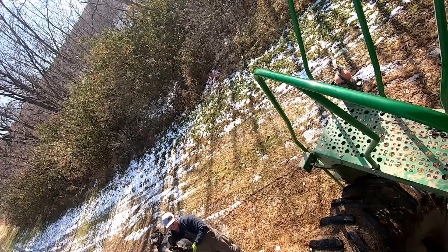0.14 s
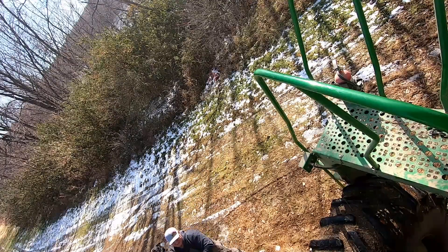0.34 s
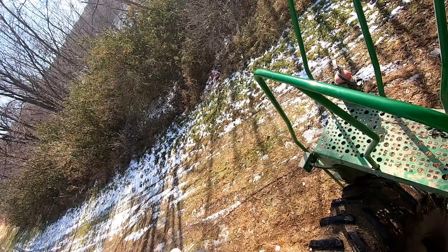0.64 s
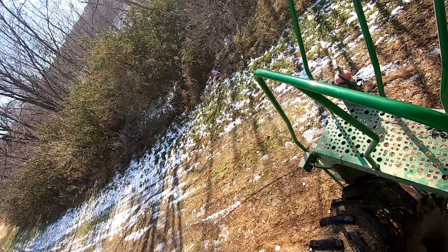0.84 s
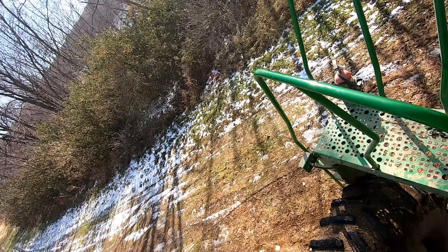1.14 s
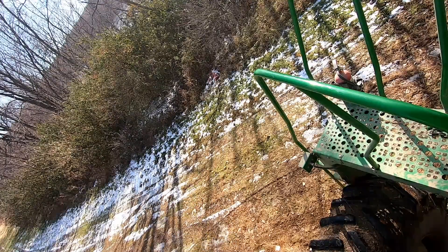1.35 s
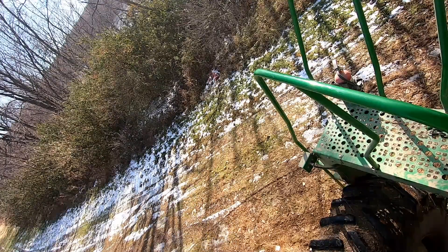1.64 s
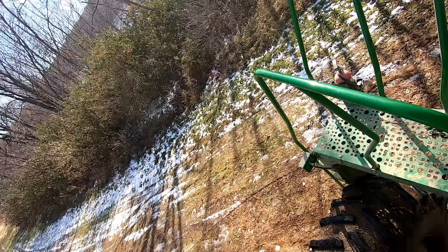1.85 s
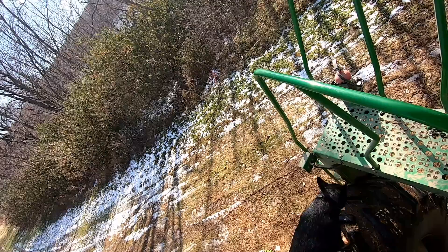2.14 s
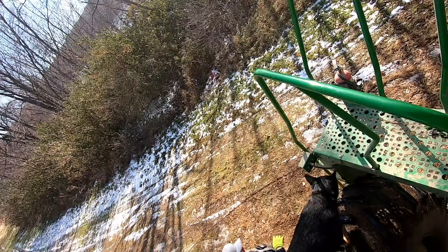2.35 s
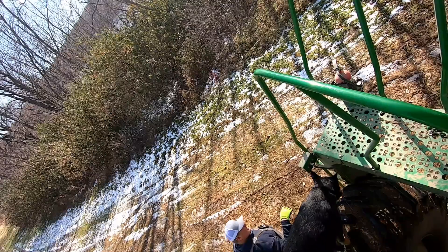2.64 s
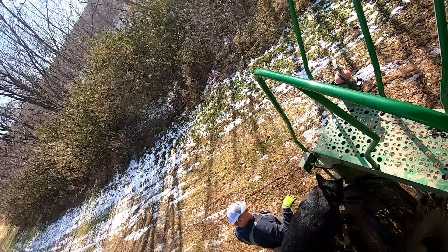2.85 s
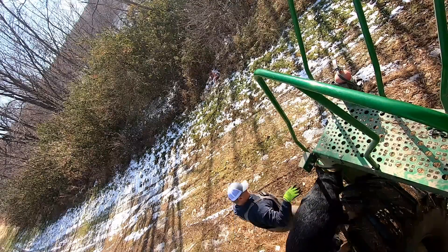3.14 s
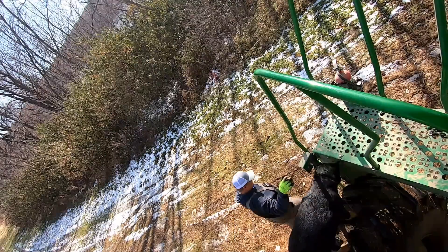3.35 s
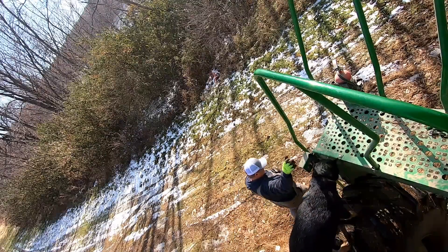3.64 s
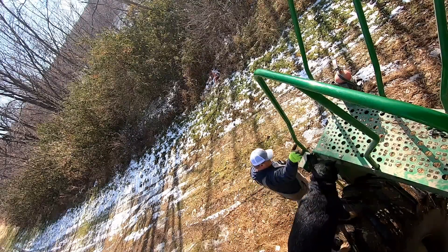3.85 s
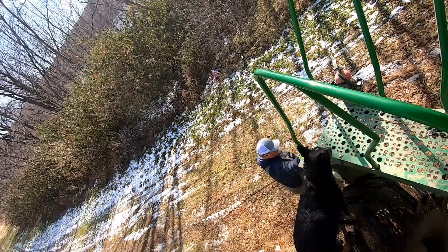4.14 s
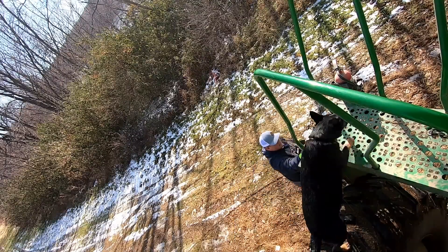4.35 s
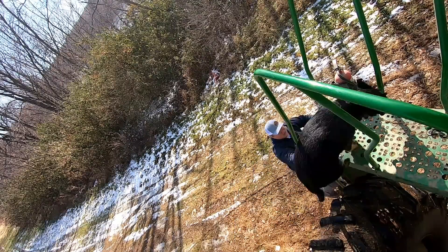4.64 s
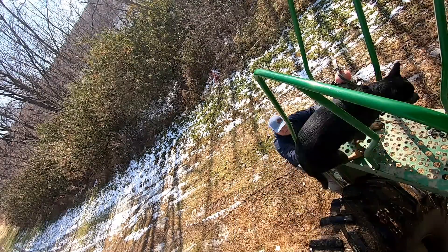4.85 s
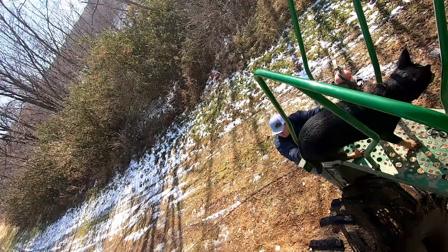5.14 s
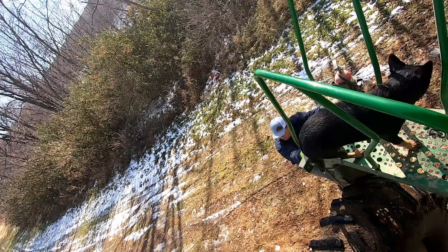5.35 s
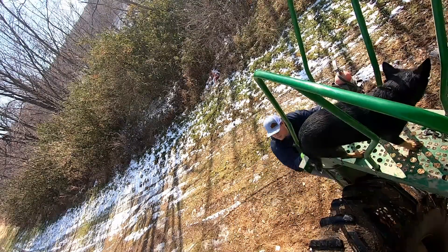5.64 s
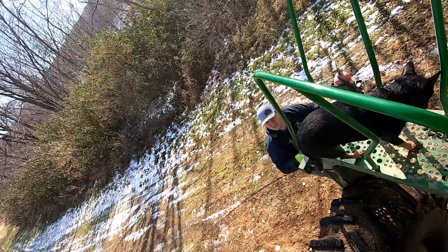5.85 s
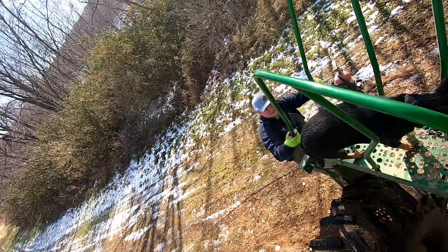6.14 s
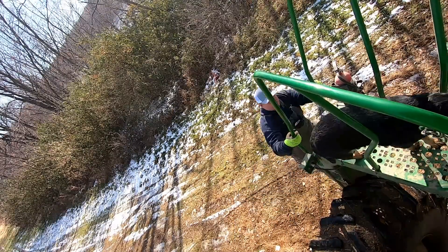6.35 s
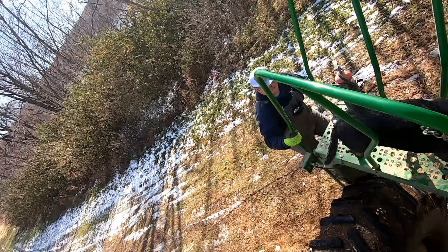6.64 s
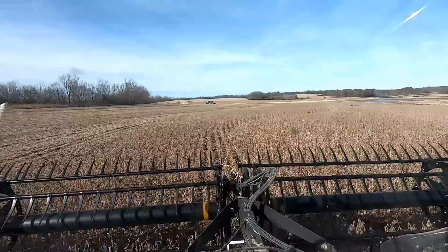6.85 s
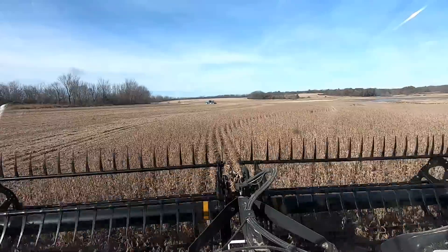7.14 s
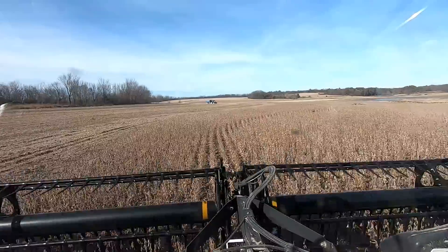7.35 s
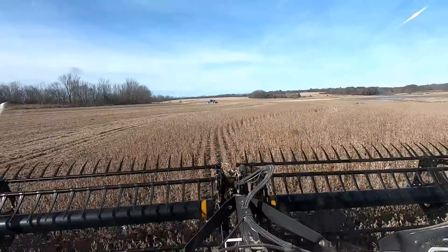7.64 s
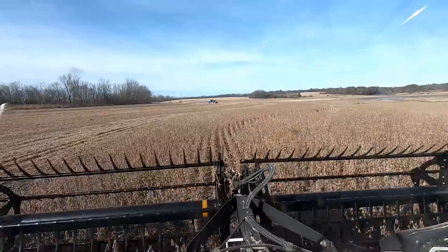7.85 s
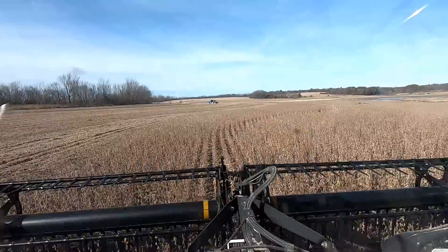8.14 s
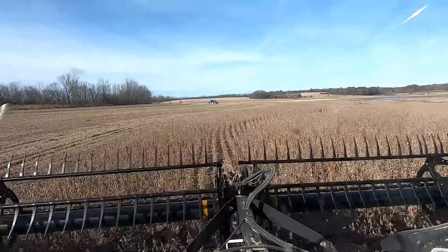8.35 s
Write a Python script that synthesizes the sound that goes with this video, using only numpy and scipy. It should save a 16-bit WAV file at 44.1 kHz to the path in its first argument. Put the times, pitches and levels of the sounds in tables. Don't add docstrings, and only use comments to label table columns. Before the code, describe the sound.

A big diesel idles with steady throb and clatter while claws tick on steel steps, then an abrupt cut to a roaring, thumping harvester cutting dry crop.

```python
import sys
import numpy as np
from scipy import signal
from scipy.fft import rfft, irfft, next_fast_len
from scipy.io import wavfile
from scipy.ndimage import uniform_filter1d

SR = 44100
rng = np.random.default_rng(int(sys.argv[2]) if len(sys.argv) > 2 else 0)


def materialize(psi):
    bounded = np.clip(np.atleast_2d(psi).T, -1, 1)
    quanta = np.round(bounded * 32767).astype(np.int16)
    wavfile.write(sys.argv[1], SR, quanta)


def gain_from_db(level_db):
    decades = np.asarray(level_db, float) / 20
    return 10 ** decades


N = 375291
TIME = np.arange(N) / SR
CHANGE_S = 6.8975

# (multiple of the two-turn engine cycle [1]), and its (level [dB])
IDLE_ORDERS = [3, 5, 6, 7, 12, 13, 30, 45, 144, 200, 246, 340]
IDLE_ORDER_DB = [-46, -52, -43.5, -52, -44, -53, -63, -63, -71, -71, -70, -80]
# (frequency [Hz]), and its (level [dB])
IDLE_TONES_HZ = [17.4, 46.4, 106.3, 151.4, 181.6, 354.6, 384.2, 531.6, 539.7, 1536.3]
IDLE_TONE_DB = [-60, -57, -44, -55, -59, -56, -57, -64, -64, -73]
# (frequency [Hz], level per Hz [dB])
EXHAUST_SPECTRUM = [(2, -20), (8, -27), (40, -19), (47, -5), (75, -4.5), (95, 1.5), (125, -8.5), (225, -10),
                    (245, -14.5), (420, -15.5), (480, -18.5), (720, -22.5), (1000, -26), (1500, -37)]
# (frequency [Hz], level per Hz [dB])
FAN_SPECTRUM = [(650, -34), (1100, -1.5), (1730, -7.5), (2450, -10.5), (3020, -13.5), (4120, -14.5),
                (4980, -16), (5150, -13.5), (5380, -18), (5690, -18.5), (7030, -17.5), (15600, -36.5)]
# (centre [Hz], width [Hz], boost [dB])
ENGINE_BAY = [(243, 22, -5), (275, 30, 2), (420, 20, 2), (438, 16, -4), (495, 40, -2), (580, 70, 3),
              (665, 55, 6.5), (712, 50, -3.5), (960, 200, 2), (1700, 200, -2.5), (2000, 120, 3),
              (3390, 90, 4), (5285, 170, 5)]
# (frequency [Hz], level per Hz [dB])
CLATTER_SPECTRUM = [(400, -30), (800, -6), (1300, -4), (2000, -5), (2700, -9), (3200, -20), (5000, -34)]
TURBO_FLUTTER_DB = 2, 3

# (time [s], peak level [dB], centre [Hz], scrape length [ms], ring [0-1])
TICKS = [(.003, -54, 8500, 8, 0), (.533, -59, 9500, 12, 0), (4.453, -51, 5500, 10, 0),
         (4.474, -53, 7500, 14, 0), (4.919, -50, 7500, 12, 0), (4.994, -43, 3900, 11, .3),
         (4.998, -48, 8500, 11, 0), (5.664, -45, 7200, 3, 0), (6.397, -49, 6000, 6, .2),
         (6.449, -41, 7600, 9, 1), (6.4915, -29, 10000, .1, 0), (6.493, -35, 5600, 9, .9),
         (6.493, -40, 10500, 11, 0), (6.508, -47, 6500, 6, .3), (6.526, -49, 8500, 14, 1),
         (6.544, -43, 6000, 7, .8), (6.547, -46, 11000, 6, .3), (7.255, -46, 8500, 6, 0)]
# (frequency [Hz], level [dB], time to fall 60 dB [s])
TAG_MODES = [(6050, 0, .03), (6550, -2, .04), (9000, -7, .03), (11300, -4, .04)]
SQUEAK_DB = [0, -8, -3, 2, -15, -22]
# (time [s], spread [s], level [dB])
BRUSHES = [
    (4.46, .06, -73),
    (5.0, .1, -69),
    (5.4, .4, -71),
    (6.51, .06, -67),
]
# (frequency [Hz], level per Hz [dB])
BRUSH_SPECTRUM = [(3000, -20), (6000, -3), (9000, 0), (13000, -6), (16000, -14)]

# (time [s], spread [s], shaft thump [dB], firing swell [dB], bar swell [dB])
STROKES = [
    (6.93, .075, -23, -29, -30),
    (7.31, .075, -25, -23, -33),
    (7.615, .11, -21, -36, -31),
    (7.93, .085, -27, -27, -33),
    (8.285, .085, -22, -26, -40),
]
# (frequency [Hz]), (resting level [dB]), (change in a pressure surge [dB])
BARS_HZ = [197, 377, 429]
BAR_REST_DB = [-44, -43, -38]
BAR_SURGE_DB = [.1, 4, -9]
# (time [s], share of nominal [1])
GROUND_SPEED = [(6.9, .996), (7.15, .996), (7.45, 1.004), (7.85, .997), (8.1, .975), (8.3, .964),
                (8.51, .96)]
# (time [s], spread [s], strength [1])
SURGES = [
    (7.29, .06, 1.),
    (7.9, .13, 1.05),
]
# (level [dB]), (change per percent of speed [dB]), (change in a surge [dB])
PUMP_LEVEL_DB = [-42, -45.5, -60, -52]
PUMP_DB_PER_PERCENT = [-1.5, 3.5, .6, .1]
PUMP_SURGE_DB = [2.5, 4.2, 17.8, .1]
PUMP_SIDE_DB = [-4, -11]
# (frequency [Hz]), and its (level [dB])
GEAR_TONES_HZ = [24.5, 41.7, 225.5, 303, 499.3, 532, 721, 997, 2495]
GEAR_TONE_DB = [-35, -34, -44.5, -46, -41, -46.5, -53, -56, -55]
# (frequency [Hz], level per Hz [dB])
ROAR_SPECTRUM = [(8.8, -35), (15, -3.5), (53, -1.5), (80, -3.5), (114, -8), (141, -5.5), (342, -16.5),
                 (477, -13), (578, -23), (977, -23.5), (1610, -26), (2150, -30), (4500, -45.5), (5850, -80),
                 (9900, -120)]
# (centre [Hz], width [Hz], boost [dB])
DRUM_HOUSING = [(5, 15, 10), (426, 110, 3), (684, 220, 7), (2230, 1140, 8), (3360, 71, 8), (1660, 210, -6),
                (2570, 220, -3), (2400, 150, 2)]
# (frequency [Hz], level per Hz [dB])
STALK_SPECTRUM = [(2060, -22), (3500, -2.5), (4670, -3), (6110, -2), (7420, -3.5), (11900, -13),
                  (14100, -19), (15600, -24)]
# (centre [Hz], width [Hz], boost [dB])
STALK_BODY = [(5990, 100, 5), (7300, 300, 2), (11500, 150, 3)]


def noise():
    return rng.standard_normal(N)


def level(x, db):
    return x * gain_from_db(db) / np.sqrt(np.mean(x ** 2))


def ramp(start, end):
    return np.clip((TIME - start) / (end - start), 0, 1)


def swells(times, peaks, spreads, order=2):
    bells = np.broadcast(times, peaks, spreads)
    return sum(p * np.exp(-.5 * abs((TIME - s) / w) ** order) for s, p, w in bells)


def walk(rate):
    k = int(SR / rate)
    held = np.repeat(rng.standard_normal(N // k + 1), k)
    return 1.299 * uniform_filter1d(uniform_filter1d(held, k), k)[:N]


def colour(x, points, body=(), flicker_db=0., rate=8.):
    size = next_fast_len(N)
    hz = np.maximum(np.arange(size // 2 + 1) * SR / size, 1)
    f, db = np.transpose(points)
    gain_db = np.interp(np.log(hz), np.log(f), db, left=-90, right=-90)
    gain_db += sum(g / (1 + (2 * (hz - c) / w) ** 2) for c, w, g in body)
    shaped = rfft(x, size) * gain_from_db(gain_db)
    place = np.clip(np.log2(hz / 30), 0, 9)
    octaves = (irfft(shaped * np.maximum(1 - abs(place - k), 0), size)[:N] for k in range(10))
    return level(sum(band * gain_from_db(flicker_db * walk(rate)) for band in octaves), 0)


def tone(hz, db, drift=0., swell_db=0., rate=4.):
    phase = 2 * np.pi * (np.cumsum(hz * (1 + drift * walk(rate))) / SR + rng.random())
    return np.sqrt(2) * gain_from_db(db + swell_db * walk(rate)) * np.sin(phase)


def tones(frequencies_hz, levels_db, **wander):
    return sum(tone(hz, db, **wander) for hz, db in zip(frequencies_hz, levels_db))


def brushing():
    s, spread, db = np.transpose(BRUSHES)
    return colour(noise(), BRUSH_SPECTRUM, flicker_db=1.5, rate=20) * swells(s, gain_from_db(db), spread)


def boot_squeak():
    start, attack, hold, release = 6.295, .008, .026, .012
    held = start + attack + hold
    shape = (ramp(start, start + attack) * (1 - ramp(held, held + release))) ** 2
    grip = np.clip(.2 + swells(start + .012, .8, .004), 0, 1)
    phase = 2 * np.pi * np.cumsum(1760 * (1 + .007 * walk(600))) / SR
    squeak = sum(gain_from_db(g) * grip ** (.47 * k) * np.sin((k + 1) * phase) for k, g in enumerate(SQUEAK_DB))
    return gain_from_db(-43.5) * squeak * shape


def claw_ticks():
    out, t = np.zeros(N), TIME[:4096]
    modes = sum(gain_from_db(g) * np.sin(2 * np.pi * f * t) * np.exp(-np.log(1000) * t / t60) for f, g, t60 in TAG_MODES)
    for s, db, hz, ms, ring in TICKS:
        fade = np.exp(-t / (ms * .0011)) * (1 - np.exp(-t / (ms * .0001)))
        scrape = rng.standard_normal(len(t)) * fade
        edges = np.clip([hz / 1.55, hz * 1.55], 500, 20000)
        band = signal.butter(3, edges, "band", fs=SR, output="sos")
        ringing = signal.fftconvolve(scrape, modes)[:len(t)]
        hit = signal.sosfilt(band, scrape + .05 * ring * ringing)
        i = int(s * SR)
        out[i:i + len(t)] += gain_from_db(db) * hit / np.abs(hit).max()
    return out


def crop():
    roar = colour(noise(), ROAR_SPECTRUM, DRUM_HOUSING, flicker_db=.07, rate=9)
    grains = noise() * gain_from_db(1.5 * rng.exponential(size=N) + .7 * walk(20))
    rustle = colour(grains, STALK_SPECTRUM, STALK_BODY, flicker_db=.7, rate=14)
    feed = gain_from_db(swells(7.8, .37, .29))
    return feed * (gain_from_db(-26) * roar + gain_from_db(-48.5) * rustle)


def pump_and_drive(surge):
    speed = np.interp(TIME, *np.transpose(GROUND_SPEED))
    percent = 100 * (speed - 1)
    settings = zip(PUMP_LEVEL_DB, PUMP_DB_PER_PERCENT, PUMP_SURGE_DB)
    db1, db2, db3, db5 = (db + slope * percent + lift * surge for db, slope, lift in settings)
    harmonics_db = [db1, db2, db3, db5 + PUMP_SIDE_DB[0], db5, db5 + PUMP_SIDE_DB[1]]
    harmonics_hz = [481 * speed * k for k in range(1, 7)]
    pump = tones(harmonics_hz, harmonics_db, drift=.0008, swell_db=1.5, rate=14)
    drive_db = -45 + 2.5 * np.minimum(percent + .5, 0) - 8 * surge
    return pump + tone(2092 * speed ** .6, drive_db, drift=.0015, swell_db=2.5, rate=25)


def sieve_and_bars(surge):
    s, length, thump_db, firing_db, bar_db = np.transpose(STROKES)
    stroke = swells(s, gain_from_db(thump_db), length, order=4)
    thump = tone(51.5, 0, drift=.015, rate=5) * (gain_from_db(-42) + stroke)
    recoil = swells(s + .18, gain_from_db(firing_db), .045)
    firing = tone(113.0, 0, drift=.004) * (gain_from_db(-48) + recoil + gain_from_db(-11) * stroke)
    bars_db = [db + lift * surge for db, lift in zip(BAR_REST_DB, BAR_SURGE_DB)]
    bars = tones(BARS_HZ, bars_db, drift=.009, swell_db=3, rate=12)
    bars += tone(BARS_HZ[0], 0, drift=.004) * swells(s + .21, gain_from_db(bar_db), .07)
    return thump + firing + bars


def full_speed():
    at, spread, strength = np.transpose(SURGES)
    surge = swells(at, strength, spread, order=4)
    gears = tones(GEAR_TONES_HZ, GEAR_TONE_DB, drift=.006, swell_db=3, rate=8)
    return sieve_and_bars(surge) + pump_and_drive(surge) + gears + crop()


def accessories():
    hum = tones(IDLE_TONES_HZ, IDLE_TONE_DB, drift=.002, swell_db=1.8, rate=2.5)
    pump_db = np.interp(TIME, (4.8, 5.7), (-66, -57.5))
    return hum + tone(767.8, pump_db, drift=.0005, swell_db=1.5)


def turbo(firing):
    shaded_s = 1.27
    shaded = ramp(shaded_s - .05, shaded_s + .045)
    db = -60 + shaded * (-5 - 1. * (TIME - shaded_s))
    flutter_db = np.interp(shaded, (0, 1), TURBO_FLUTTER_DB)
    hz = 5282 - 2.9 * TIME + 30 * firing
    return tone(hz, db, drift=.0008, swell_db=flutter_db, rate=45) * (1 + .15 * firing)


def moving_air(firing):
    exhaust = colour(noise() * (1 + .07 * firing), EXHAUST_SPECTRUM, ENGINE_BAY, flicker_db=.6, rate=7)
    fan = colour(noise() * (1 + .05 * firing), FAN_SPECTRUM, ENGINE_BAY, flicker_db=.5, rate=9)
    return level(exhaust, -36) + level(fan, -53)


def clatter(cycle):
    turn = rng.standard_normal((3, 2048)) * gain_from_db(1.5 * rng.exponential(size=(3, 2048)))
    pattern = np.concatenate([turn[0] + .71 * turn[1], turn[0] + .73 * turn[2]])
    knocks = np.interp(cycle % 1 * 4096, np.arange(4096), pattern, period=4096)
    return level(colour(knocks, CLATTER_SPECTRUM), -55)


def engine_throb(cycle):
    out = np.zeros(N)
    for k, db in zip(IDLE_ORDERS, IDLE_ORDER_DB):
        wave = np.sin(2 * np.pi * (k * cycle + rng.random()))
        out += np.sqrt(2) * gain_from_db(db + 1.2 * walk(3)) * wave
    return out


def idle():
    cycle = 9.992 * TIME + .0005 * walk(1.5)
    firing = np.cos(2 * np.pi * 6 * cycle)
    return accessories() + turbo(firing) + moving_air(firing) + clatter(cycle) + engine_throb(cycle)


def scene():
    later = ramp(CHANGE_S, CHANGE_S + .002)
    jump = .13 * (1 - later) * (TIME >= CHANGE_S)
    steps = brushing() + boot_squeak() + claw_ticks()
    return ((1 - later) * idle() + later * full_speed() + jump + steps)[None]


def low_pass(x):
    return signal.sosfilt(signal.butter(12, 15780, fs=SR, output="sos"), x)


def record(dry):
    return low_pass(dry)


dry = scene()
out = record(dry)
materialize(out)
```